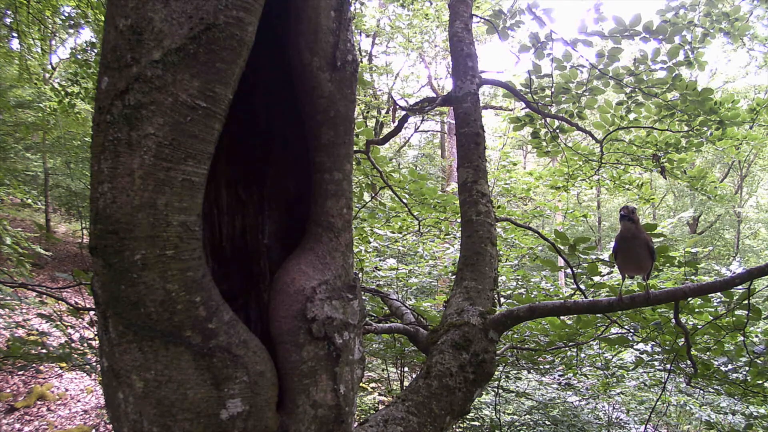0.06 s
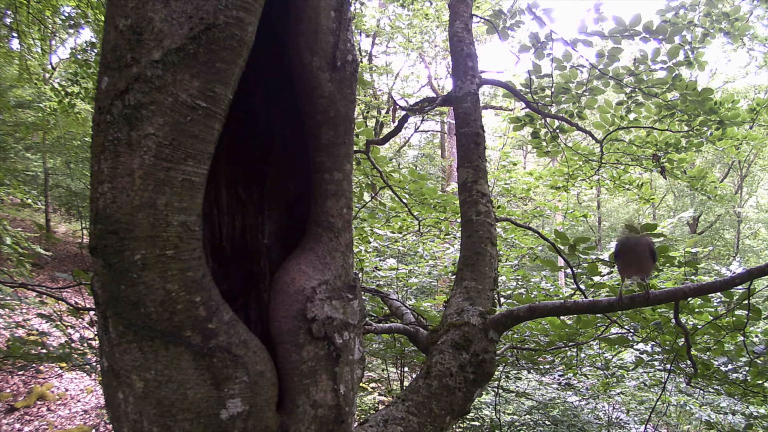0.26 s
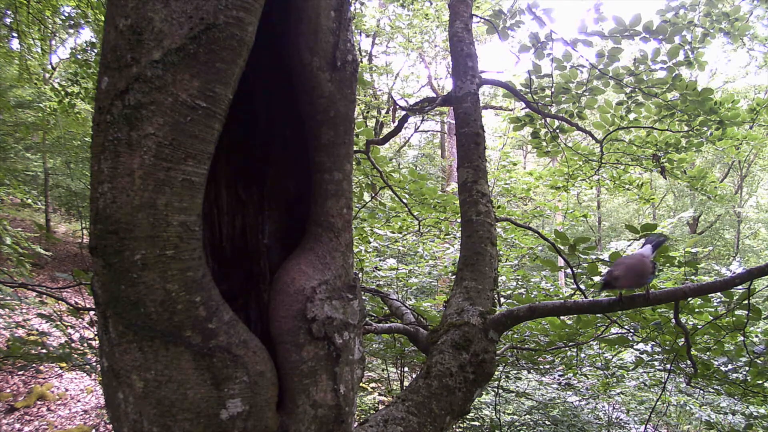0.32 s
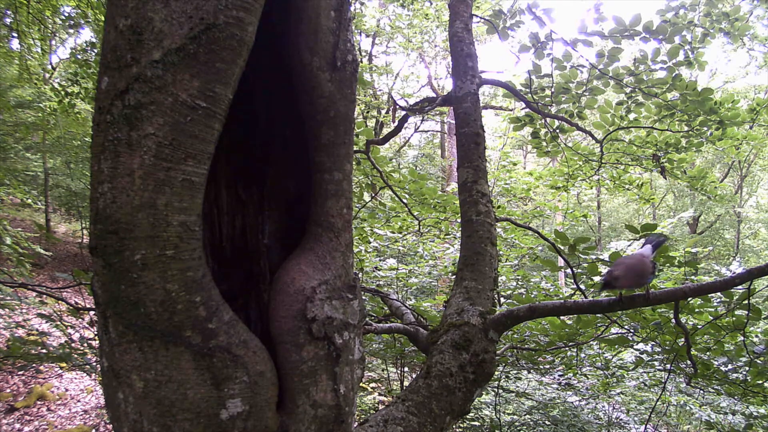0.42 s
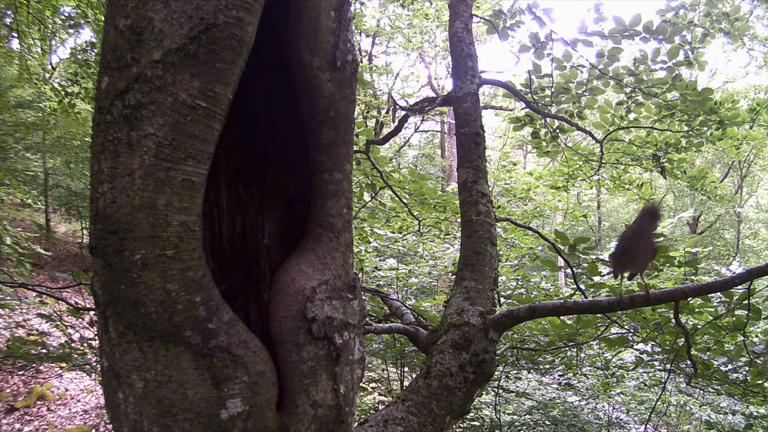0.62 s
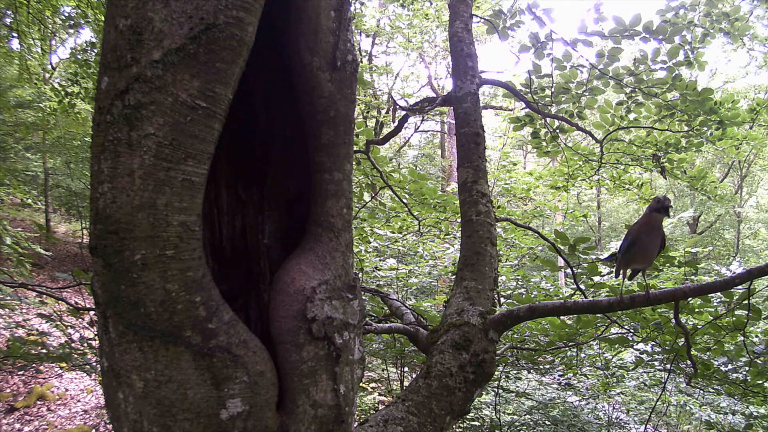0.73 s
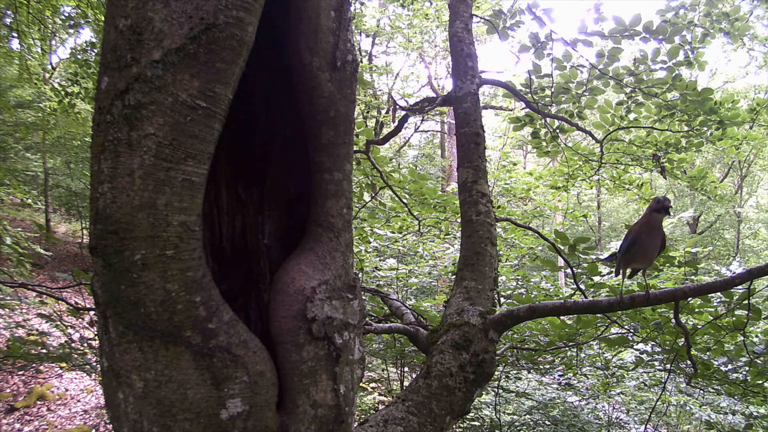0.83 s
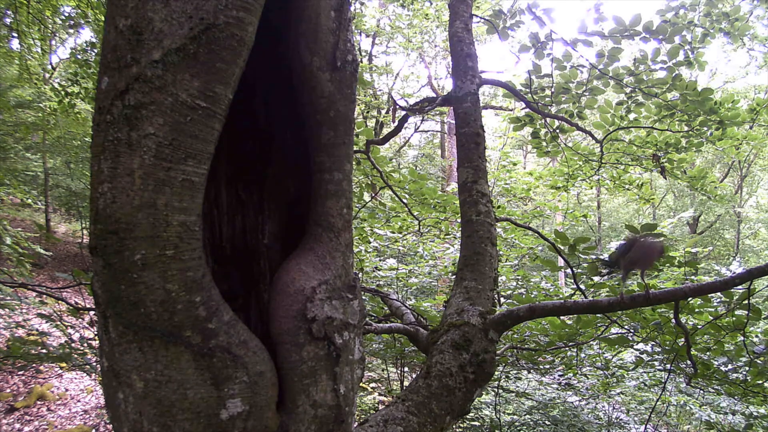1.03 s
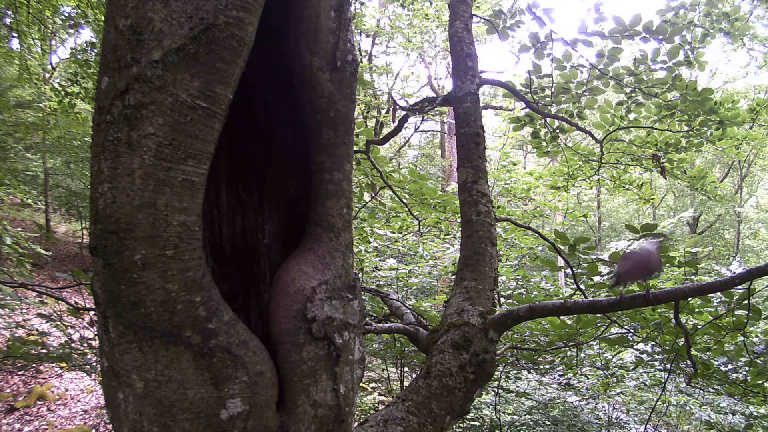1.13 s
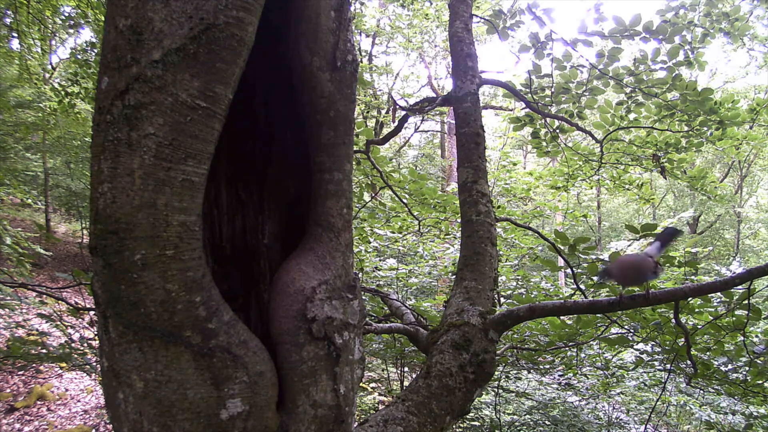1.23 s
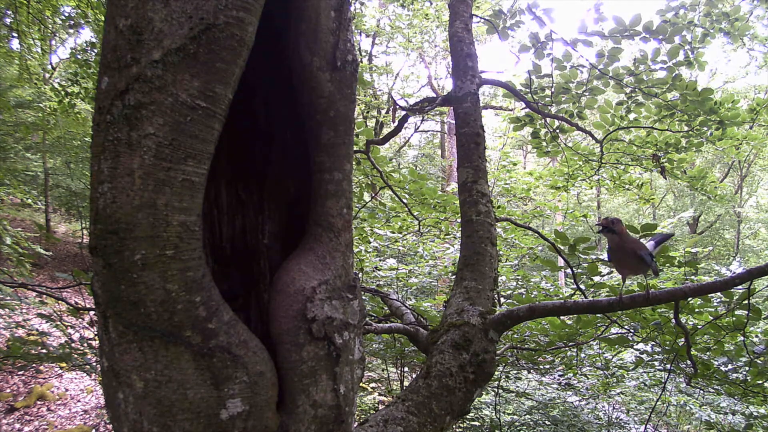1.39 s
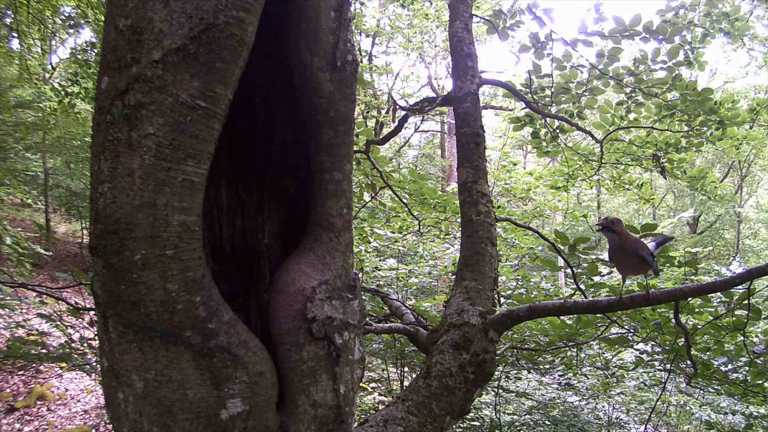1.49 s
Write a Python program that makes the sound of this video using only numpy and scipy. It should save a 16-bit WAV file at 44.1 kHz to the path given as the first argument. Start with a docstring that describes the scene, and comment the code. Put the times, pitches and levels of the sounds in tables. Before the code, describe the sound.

Two hoarse bird screeches, a jay scolding over faint forest hiss.

```python
"""A jay scolds twice in a quiet forest, heard in mono.
Each screech starts as a dry rattle and swells into two voices, one from each side of the syrinx,
whose sum and difference tones crowd into the throat's resonances over a noisy rasp.
The trees give a faint echo; air rumbles softly at the microphone."""
import sys
import numpy as np
from scipy import signal
from scipy.fft import rfft, irfft, next_fast_len
from scipy.io import wavfile
from scipy.ndimage import uniform_filter1d, map_coordinates

SR = 44100
rng = np.random.default_rng(int(sys.argv[2]) if len(sys.argv) > 2 else 0)


def transcribe(u):
    """Save the signal u as a 16-bit wav file named by the first command-line argument.

    u: samples, shape (n,) or (channels, n), limited to [-1, 1]; the rate is SR.
    q: integer samples, one column per channel.
    """
    v = np.clip(np.atleast_2d(u).T, -1, 1)
    q = np.round(v * 32767).astype(np.int16)
    wavfile.write(sys.argv[1], SR, q)


N = 68355

# rasp spectrum: (frequency [Hz], gain [dB])
RASP_SPECTRUM = [(300, -62.5), (600, -31.5), (800, -37), (950, -25), (1130, -36), (1550, -12.5),
                 (1900, -8.5), (2300, -21), (2700, -13), (3150, -1.5), (3450, -6.5), (3680, -10.5),
                 (4050, -3), (4400, 2.5), (4680, -8), (4900, -15.5), (5400, -7.5), (5800, -18.5),
                 (6200, -10), (6550, -19), (6850, -19.5), (7500, -27), (8200, -43.5)]
SHIMMER_DB = 1.16
HOARSE_REF_HZ, HOARSE_RATE_HZ = 5700, 450  # phase scatter: reference pitch, rate of change


def screech(start_s, end_s, rise_s, lower, ratio, texture, effort, mix_db):
    """One call: both sides of the syrinx sound over a rasp, chopped at first by the rattle."""
    t = np.arange(N) / SR
    low_hz, *harmonic_db = curves(lower)
    low_hz = low_hz * (1 + .003 * wobble(55))
    up_hz = low_hz * curves(ratio)[0]
    jitter_hz, mixed_db, rasp_db, depth = curves(texture)
    effort_db, = curves(effort)
    low_rad = phase(low_hz + 0.38 * jitter_hz * wobble(700))
    up_rad = phase(up_hz + jitter_hz * wobble(700)) + 0.006 * jitter_hz * wobble(700)
    voices = low_rad, up_rad, low_hz, up_hz
    swell = np.clip((t - start_s) / rise_s, 0, 1) ** 2
    voice = swell * lower_voice(low_rad, low_hz, harmonic_db)
    mixed = mixed_tones(*voices, mix_db)
    puffs = rattle(depth)
    buzz_share = .7 / (1 + (jitter_hz / 14) ** 2)  # hiss turns to buzz as the voices steady
    rasp = np.sqrt(1 - buzz_share) * hiss(low_rad, up_rad, puffs) + np.sqrt(buzz_share) * buzz(*voices)
    rasp = np.sqrt(1 - depth) * rasp + np.sqrt(depth) * croak(puffs)
    throat = amp(mixed_db) * mixed * puffs + amp(rasp_db) * rasp
    attack_s, release_s = 0.0041, 0.007
    gate = np.clip((t - start_s) / attack_s, 0, 1) * np.clip((end_s - t) / release_s, 0, 1) ** 2
    return gate * (voice * puffs + amp(effort_db - 0.1 * wobble(90)) * throat)


def lower_voice(low_rad, low_hz, harmonic_db):
    """Shimmering harmonics from one side of the syrinx."""
    return sum(amp(db + SHIMMER_DB * wobble(120)) * np.sqrt(2) * np.cos(k * low_rad - lag_rad(k * low_hz))
               for k, db in enumerate(harmonic_db, 1))


def mixed_tones(low_rad, up_rad, low_hz, up_hz, mix_db):
    """Sum and difference tones of the two voices, hoarser with pitch, levelled to running rms 1."""
    # tone orders: (multiple of lower pitch, multiple of upper pitch)
    orders = [(-1, 1), (-2, 2), (3, -1), (0, 1), (-1, 2), (-4, 4), (0, 2), (2, 1), (-1, 3), (1, 2), (-2, 4),
              (3, 1), (0, 3), (2, 2), (4, 1), (6, 0), (3, 2), (5, 1), (7, 0), (6, 1)]
    # throat and beak response: (frequency [Hz], gain [dB])
    throat = [(300, -60), (620, -32), (950, -12), (1150, -29.5), (1550, -8.5), (1900, -8.5), (2300, -15),
              (2800, -13), (3150, -1), (3650, -18.5), (4050, 5.5), (4400, 6.5), (4650, -4), (4900, -32),
              (5400, -5), (6200, -14.5), (6700, -23.5), (7500, -28), (8200, -63.5)]
    tones = 0
    for (n, m), db in zip(orders, mix_db):
        hz = np.abs(n * low_hz + m * up_hz)
        scatter_rad = .5 * (hz / HOARSE_REF_HZ) ** 4 * wobble(HOARSE_RATE_HZ)
        gain = amp(db + along(throat, hz) + SHIMMER_DB * wobble(150))
        tones = tones + gain * np.cos(n * low_rad + m * up_rad - lag_rad(hz) + scatter_rad)
    return tones / np.sqrt(np.abs(uniform_filter1d(tones ** 2, size=900)) + 1e-9)


def rattle(depth, rate_hz=181.4):
    """Uneven train of sharp, dying puffs that chops the air flow."""
    cycle = phase(rate_hz * (1 + 0.078 * wobble(rate_hz))) / (2 * np.pi) % 1
    return np.sqrt(1 - depth + depth * unit(np.exp(-1.9 * cycle)) ** 2)


def croak(puffs):
    """Noisy puffs ring the throat's resonances."""
    # resonances: (centre [Hz], width [Hz], gain [dB])
    modes = [(933, 28, -3.5), (1545, 190, -3), (2900, 630, -5.5), (4520, 280, -1.5)]

    def response(hz):
        return sum((-1) ** k * amp(db) * 1j * hz * width / (centre ** 2 - hz ** 2 + 1j * hz * width)
                   for k, (centre, width, db) in enumerate(modes))
    return unit(filtered(puffs * rng.standard_normal(N), response))


def hiss(low_rad, up_rad, puffs):
    """Flow noise chopped by the puffs, the lower voice and the beat of both voices."""
    beat = 1 + 0.55 * np.cos(2 * up_rad - 3 * low_rad)
    flow = puffs * (1 + 0.41 * np.cos(low_rad)) * beat * rng.standard_normal(N)
    return unit(filtered(flow, lambda hz: amp(along(RASP_SPECTRUM, hz)) * np.exp(-1j * lag_rad(hz))))


def buzz(low_rad, up_rad, low_hz, up_hz):
    """Dense comb of high-order tones that the two voices make together."""
    orders = [(n, m) for m in range(-3, 5) for n in range(-6, 13) if 1 < n + 1.63 * m < 7.6]
    comb = 0
    for n, m in orders:
        hz = np.abs(n * low_hz + m * up_hz)
        scatter_rad = .8 * hz / HOARSE_REF_HZ * wobble(HOARSE_RATE_HZ) + 2 * np.pi * rng.random()
        comb = comb + amp(along(RASP_SPECTRUM, hz)) * np.cos(n * low_rad + m * up_rad + scatter_rad)
    return unit(comb)


def lag_rad(hz):
    """The throat delays high tones more than low ones."""
    return (hz / 1308) ** 2


def tree_echo(x, decay):
    """Diffuse echo from the trees, each frequency dying at its own rate."""
    hz, t, spectra = signal.stft(rng.standard_normal(SR), SR, nperseg=256)
    t60_s = along(decay, hz)[:, None]
    tail = signal.istft(spectra * amp(-60 * t / t60_s), SR, nperseg=256)[1]
    return signal.fftconvolve(x, tail / np.linalg.norm(tail))[:N]


def background():
    """Faint forest hiss and a low, uneven rumble of air."""
    # hiss and rumble spectra: (frequency [Hz], gain [dB])
    air = [(88, -31.5), (150, -8), (317, -9.5), (465, -10), (1940, -18.5), (4110, -25), (4930, -30),
           (6770, -26.5), (7990, -44), (10400, -70.5), (17600, -120)]
    rumble = [(8.8, -42.5), (15, 12), (34, -0.5), (145, -13.5), (222, -16.5), (308, -28), (400, -30.5),
              (520, -53.5), (880, -120)]
    # rumble envelope: (time [s], level [dB])
    rumble_level = [(0.0, -62), (0.11, -68), (0.55, -62), (0.65, -63.5), (0.966, -68.5), (1.0, -55),
                    (1.036, -65.5), (1.334, -67), (1.462, -59), (1.506, -70), (1.55, -54.5)]
    return amp(-77.5) * noise(air) + amp(curves(rumble_level)[0]) * noise(rumble)


def amp(db):
    """Decibels to gain."""
    return 10 ** (np.asarray(db) / 20)


def unit(x):
    """Scale to rms 1."""
    return x / np.sqrt(np.mean(x ** 2) + 1e-20)


def along(points, hz):
    """Interpolate (frequency [Hz], value) points on a log axis."""
    knots_hz, values = np.transpose(points)
    return np.interp(np.log(hz + 1), np.log(knots_hz + 1), values)


def curves(rows):
    """One value per sample for each column after the time."""
    times_s, *columns = np.transpose(rows)
    return [np.interp(np.arange(N) / SR, times_s, column) for column in columns]


def wobble(rate_hz):
    """Smooth random curve, rate_hz knots a second."""
    return map_coordinates(rng.standard_normal(N), [np.arange(N) * rate_hz / SR], mode="wrap")


def filtered(x, response):
    """Apply a frequency response."""
    size = next_fast_len(N + SR // 2)
    return irfft(rfft(x, size) * response(np.fft.rfftfreq(size, 1 / SR)), size)[..., :N]


def noise(spectrum):
    """Coloured noise of rms 1."""
    return unit(filtered(rng.standard_normal(N), lambda hz: amp(along(spectrum, hz))))


def phase(hz):
    """Running phase [rad] from a random start."""
    return 2 * np.pi * (np.cumsum(hz) / SR + rng.random())


def scene():
    """Two screeches, near and far echoes and background, alike in both channels."""
    # calls: (start [s], end [s], rise of lower voice [s])
    calls = [(.173, .671, 0.025), (.83, 1.299, 0.085)]
    # lower voice: (time [s], pitch [Hz], levels of harmonics 1-5 [dB])
    lower_1 = [(0.21, 804.6, -81, -56, -64, -69, -66.5), (0.24, 816.1, -81, -49.5, -78.5, -68, -56.5),
               (0.249, 878.4, -61.5, -49.5, -67.5, -52, -40), (0.301, 893.3, -63, -51, -62, -45.5, -44),
               (0.379, 926.4, -60, -50.5, -50.5, -56, -48), (0.406, 994.3, -53, -51, -41, -42.5, -80),
               (0.477, 1037, -73, -54.5, -44, -40, -52), (0.526, 1025, -64.5, -51, -43, -58, -73),
               (0.548, 1044, -66.5, -54, -42, -54.5, -65.5), (0.58, 1024, -68, -55, -46.5, -43.5, -60.5),
               (0.61, 1044, -64, -52, -51, -52.5, -54), (0.635, 975.4, -64, -51.5, -63, -54, -68),
               (0.647, 939, -57, -61.5, -58.5, -68, -71.5), (0.66, 926, -66, -72, -70, -73, -79.5)]
    lower_2 = [(0.91, 629.5, -81, -64, -61, -71, -78), (0.97, 766.8, -72, -53.5, -62, -47, -75),
               (0.98, 823.4, -69.5, -49.5, -65.5, -76, -56.5), (1.006, 921, -66, -51.5, -88, -47.5, -68.5),
               (1.037, 951.4, -52, -44.5, -54.5, -57.5, -66.5), (1.081, 987.6, -54.5, -50, -42, -40, -71),
               (1.132, 967.2, -53, -49.5, -47, -49.5, -76.5), (1.16, 975.7, -51.5, -51.5, -43.5, -50, -70),
               (1.21, 976.2, -53.5, -51, -47, -51, -79), (1.24, 994, -55, -56.5, -48, -44, -78.5),
               (1.271, 957.4, -52.5, -55, -48.5, -56.5, -66), (1.291, 933.6, -68.5, -65, -63.5, -72, -72.5)]
    # upper voice, ending at 5:3 in call 2: (time [s], upper pitch / lower pitch)
    ratio_1 = [(.2, 1.95), (.26, 1.8), (.31, 1.78), (.36, 1.69), (.41, 1.66), (.47, 1.625), (.62, 1.625),
               (.66, 1.66)]
    ratio_2 = [(.9, 2.2), (.97, 1.95), (1.03, 1.7), (1.06, 1.64), (1.14, 1.645), (1.165, 5 / 3),
               (1.29, 5 / 3)]
    # grain: (time [s], jitter [Hz], mixed tones [dB], rasp [dB], rattle depth [0-1])
    texture_1 = [(0.177, 80, -7.5, 12, 1), (0.224, 35, -0.5, -4.5, 0.13), (0.279, 25, -12, -4.5, 0.07),
                 (0.361, 16, -2, -7, 0), (0.422, 15, -2.5, -11, 0), (.48, 12, -3, -6.5, 0),
                 (.53, 5.8, -1, -5.5, 0), (.61, 5.8, 0.5, -3.5, 0.05), (0.652, 64, -19.5, 1, 0.28)]
    texture_2 = [(0.836, 91.6, -19, 4, 1), (0.891, 99, -2.5, 2.5, 0.59), (0.951, 92, 3, -1, 0),
                 (1.019, 43.7, -2.5, 3, 0), (1.057, 14.2, -0.5, -12, 0), (1.15, 15, 3.5, 3, 0),
                 (1.163, 6.5, 5, -9, 0), (1.248, 6.5, 0.5, -13, 0), (1.286, 79, 1.5, -1.5, 0.47)]
    # effort behind mixed tones and rasp, per call: (time [s], level [dB])
    effort = [
        [(0.178, -71.5), (0.198, -52), (0.226, -41), (0.354, -40), (0.376, -39.5), (0.384, -35.5),
         (0.424, -33.5), (0.608, -40.5), (0.642, -44.5), (0.65, -49), (0.66, -54.5)],
        [(0.833, -66), (0.847, -59), (0.963, -47), (0.973, -49), (0.981, -44.5), (1.035, -46.5), (1.047, -36),
         (1.139, -46), (1.237, -39.5), (1.275, -46.5), (1.292, -58.5)],
    ]
    # mixed tones, per call: (weight of each tone order [dB])
    mix_db = [
        [-3, -4, -6.5, -3, -8, 1.5, -10.5, -21, -5, -0.5, 3, 7, -4.5, -6, -4.5, -0.5, -11, -1.4, -1.5, 2.5],
        [-2, -11.5, -36.5, -1, 0.5, -2.5, -17, 4, -23.5, -9, 4.5, -7, -5.5, -2.5, -9, -3, -9.5, -1.5, -2, -1],
    ]
    # near and far echo decay: (frequency [Hz], t60 [s])
    trunks = [(500, 0.054), (8000, 0.014)]
    forest = [(500, 0.15), (4000, 0.49), (8000, 1)]
    jay = (screech(*calls[0], lower_1, ratio_1, texture_1, effort[0], mix_db[0])
           + screech(*calls[1], lower_2, ratio_2, texture_2, effort[1], mix_db[1]))
    mono = jay + amp(-19) * tree_echo(jay, trunks) + amp(-24.5) * tree_echo(jay, forest) + background()
    return np.array([mono, mono])


def record(dry):
    """Two narrow notches and a steep treble cut-off."""
    # spectral dips: (centre [Hz], half width [Hz])
    notches = [(2495, 48), (4995, 180)]
    top_hz, taper_hz = 8300, 450

    def response(hz):
        dips = np.prod([(hz - centre) / (hz - centre - 1j * half) for centre, half in notches], axis=0)
        return dips * np.clip((top_hz - hz) / taper_hz, 0, 1)
    return filtered(dry, response)


dry = scene()
out = record(dry)
transcribe(out)
```